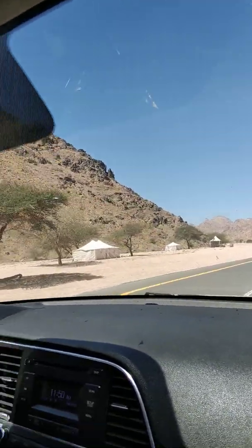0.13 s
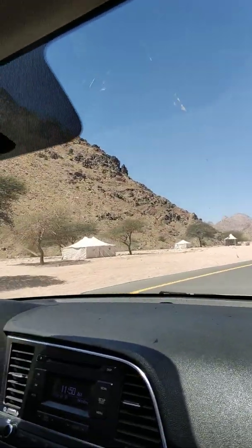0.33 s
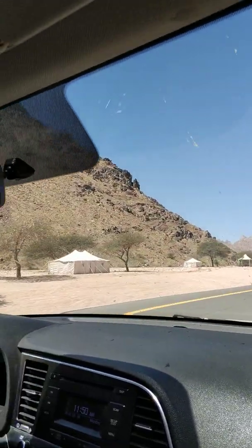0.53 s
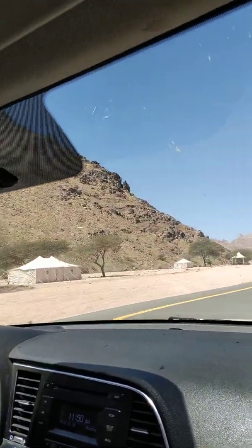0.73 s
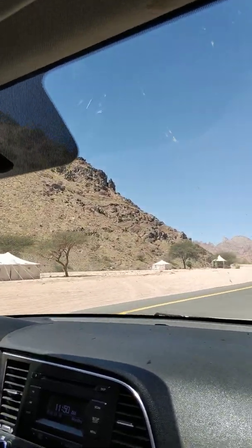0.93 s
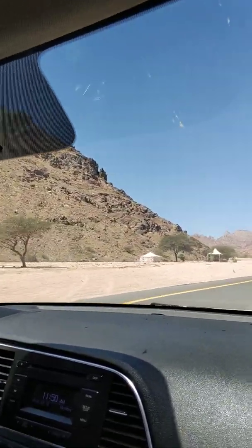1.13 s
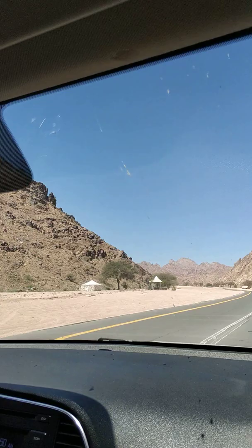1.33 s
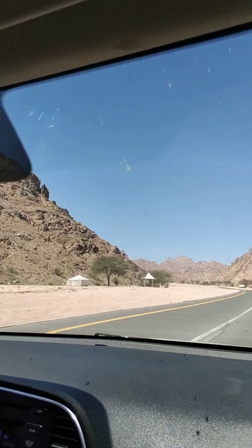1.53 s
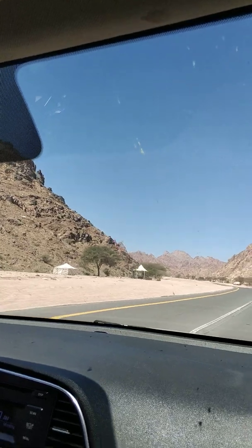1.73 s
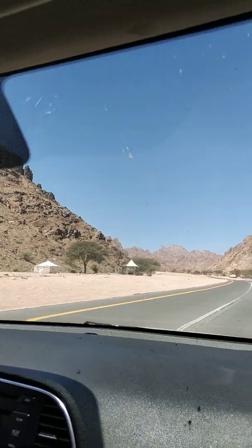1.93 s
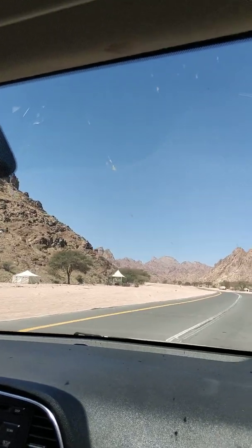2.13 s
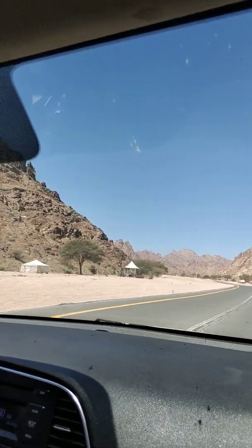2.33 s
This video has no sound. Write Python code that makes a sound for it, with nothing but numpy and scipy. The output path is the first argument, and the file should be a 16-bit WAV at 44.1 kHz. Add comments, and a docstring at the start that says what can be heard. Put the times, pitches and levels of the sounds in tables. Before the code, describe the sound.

Inside a moving car, a heavy low drone surges and flutters with the road surface; dull tyre noise sits behind, tiny clicks and faint rustles come early, then a short plastic rattle; handheld microphone slightly overloaded by bumps.

```python
"""Inside a car at steady speed, about 2.4 s. Throughout: tyres and wind rush dully as shaped stereo noise,
drive-train sines whine, the floor pan thrums, and noise-fed resonances shake the body near 37 Hz and boom
the cabin near 105 Hz around a firing tone. Faint treble rustles start at 0.16, 0.41 and 1.22 s; tiny noise
clicks fall from 0.29 to 1.0 s. From 0.41 s the strongest bumps push low, and the overloaded recorder ticks
thinly at 6 and 12 kHz just before each peak. Near 1.5 s the trim is tapped four times and rings as decaying
sines. The end fades within milliseconds."""
import sys
import numpy as np
from scipy import signal
from scipy.fft import rfft, irfft, next_fast_len
from scipy.io import wavfile
from scipy.ndimage import uniform_filter1d, map_coordinates

SR = 44100
rng = np.random.default_rng(int(sys.argv[2]) if len(sys.argv) > 2 else 0)


def inscribe(sig):
    """Save sig as 16-bit PCM at rate SR to the path in sys.argv[1].

    A 1-D sig is mono; a 2-D sig holds one channel per row.
    Samples are clipped to [-1, 1] before scaling.
    """
    pcm = np.round(np.clip(np.atleast_2d(sig).T, -1, 1) * 32767)
    wavfile.write(sys.argv[1], SR, pcm.astype(np.int16))


N = 105178
T = np.arange(N) / SR
SMOOTH_S = 0.011  # averaging window of road-driven levels and of the swelling estimate


def amp(db):
    """Linear gain from dB."""
    return 10 ** (np.asarray(db) / 20)


def unit(x):
    """x at rms 1."""
    return x / np.sqrt(np.mean(x ** 2) + 1e-20)


def along(points, hz):
    """(freq_hz, value) points read on a log frequency axis."""
    freq_hz, value = np.transpose(points)
    return np.interp(np.log(hz + 1), np.log(freq_hz + 1), value)


def curve(points):
    """(time_s, value) points read at every sample."""
    time_s, value = np.transpose(points)
    return np.interp(T, time_s, value)


def smooth(x):
    """Moving average over SMOOTH_S."""
    return uniform_filter1d(x, int(SMOOTH_S * SR))


def wobble(rate_hz):
    """Smooth random curve with rate_hz knots a second."""
    knots = rng.standard_normal(int(N * rate_hz / SR) + 4)
    return map_coordinates(knots, [T * rate_hz])


def filtered(x, response):
    """x times a response of frequency, zero-padded against wrap-around."""
    m = next_fast_len(N + SR // 2)
    return irfft(rfft(x, m) * response(np.fft.rfftfreq(m, 1 / SR)), m)[..., :N]


def tone(hz):
    """Sine of rms 1 that follows a pitch curve from a random phase."""
    cycles = np.cumsum(hz) / SR + rng.random()
    return np.sqrt(2) * np.sin(2 * np.pi * cycles)


def bell(s, width_s):
    """Gaussian bump in time; width_s is its standard deviation."""
    return np.exp(-.5 * ((T - s) / width_s) ** 2)


def ring(shape):
    """Resonance fed by noise, mono, rms 1."""
    return unit(filtered(rng.standard_normal(N), lambda hz: amp(along(shape, hz))))


def steadied(x, share):
    """x with part of its own swelling divided out, rms 1."""
    size = smooth(np.abs(signal.hilbert(unit(x))))
    return unit(x / (size + 0.11) ** share)


# cabin lean of stereo noise: freq_hz, left_over_right_db
CABIN_LEAN = [(200, .6), (400, -.2), (900, .2), (1800, 4.5), (2800, 5), (5000, -.5), (9000, 1),
              (13000, 1.5)]


def noise(spectrum, alike):
    """Stereo noise of rms 1: mid and side mixed for a given left-right likeness, then leaned."""
    def mid_side(hz):
        turn = np.arccos(np.clip(along(alike, hz), -1, 1)) / 2
        return amp(along(spectrum, hz)) * [np.cos(turn), np.sin(turn)]

    def lean(hz):
        half_db = along(CABIN_LEAN, hz) / 2
        return amp([half_db, -half_db])

    mid, side = filtered(rng.standard_normal((2, N)), mid_side)
    return unit(filtered(np.array([mid + side, mid - side]), lean))


# air hiss spectrum: freq_hz, density_db
HISS_SPECTRUM = [(2200, -30), (3200, -1), (4000, -2.5), (5000, -5.5), (6300, -5.5), (8000, -5), (10000, -8),
                 (13000, -11.5), (15700, -16.5)]
# treble nearly unrelated left to right: freq_hz, likeness_ratio
AIR_LIKENESS = [(3000, .1)]
HISS_DB = -66  # mean


def hiss():
    """Thin broadband air noise, slightly unsteady."""
    return amp(HISS_DB + 0.73 * wobble(12)) * noise(HISS_SPECTRUM, AIR_LIKENESS)


# tyre and wind rush spectrum: freq_hz, density_db
RUSH_SPECTRUM = [(150, -52.5), (250, -11.5), (281, -11.5), (303, -8.5), (355, -7.5), (375, -18.5),
                 (408, -14.5), (527, -13.5), (789, -21), (850, -21), (925, -22), (1220, -29.5),
                 (2010, -30.5), (2600, -35.5), (2950, -43), (3400, -45), (4130, -64), (7000, -120)]
# likeness of cabin noise, left to right: freq_hz, likeness_ratio
CABIN_LIKENESS = [(100, 0.98), (200, 0.98), (330, .7), (500, 0.021), (760, 0.48), (1200, .3), (1800, -0.36),
                  (2800, 0.34)]
RUSH_DB = -42  # mean


def rush():
    """Tyres and wind through the trim: dull noise with slow and quick unsteadiness."""
    level_db = RUSH_DB + 1.0 * wobble(1.5) + 0.6 * wobble(16)
    return amp(level_db) * noise(RUSH_SPECTRUM, CABIN_LIKENESS)


# road roar, before ROAR_OVER_DB and wobble: time_s, level_db
ROAR_LEVEL = [(0.03, -30), (0.12, -40.5), (0.15, -31.5), (0.23, -37), (0.27, -29.5), (1.01, -30),
              (1.07, -27), (1.12, -32), (1.46, -27), (1.76, -33), (1.89, -26.5), (1.92, -33.5),
              (2.03, -30.5), (2.38, -35)]
# road roar spectrum: freq_hz, density_db
ROAR_SPECTRUM = [(40, -120), (60, -2), (72, -15.5), (100, -1), (135, -5.5), (152, -7), (178, -15),
                 (200, -12.5), (235, -31), (270, -30.5), (400, -29), (800, -120)]
ROAR_OVER_DB = 6


def roar():
    """Low noise whose level follows the road surface."""
    level_db = curve(ROAR_LEVEL) + ROAR_OVER_DB + 1.4 * wobble(8.9)
    return amp(level_db) * noise(ROAR_SPECTRUM, CABIN_LIKENESS)


# drive-train tones, mean values before lean: pitch_hz, level_db
WHINE_TONES = [(179, -39.5), (247, -56.5), (403, -53), (428, -63.5), (528, -63.5), (806, -61.5),
               (905, -61.5)]


def engine():
    """Faint drive-train sines, unsteady in pitch and level."""
    out = np.zeros(N)
    for pitch_hz, level_db in WHINE_TONES:
        level = amp(level_db + 0.35 * wobble(5.3))
        out += level * tone(pitch_hz * (1 + .003 * wobble(3)))
    return out


# rustles, before flutter: start_s, length_s, level_db
RUSTLE_TIMES = [(.16, .13, -63), (.41, .17, -67), (1.22, .14, -69)]
# rustle spectrum: freq_hz, density_db
RUSTLE_SPECTRUM = [(3000, -20), (4500, -6), (8500, 0), (11000, -6), (13000, -6), (14500, -3), (15700, -6)]
RUSTLE_EDGE_S = .025


def rustles():
    """Faint rustling nearby: ramped treble noise with a rapid random flutter."""
    edge = lambda u: np.clip(u / RUSTLE_EDGE_S, 0, 1)
    swell = np.zeros(N)
    for start_s, length_s, level_db in RUSTLE_TIMES:
        swell += amp(level_db) * edge(T - start_s) * edge(start_s + length_s - T)
    return swell * amp(2.1 * wobble(90)) * noise(RUSTLE_SPECTRUM, AIR_LIKENESS)


# tiny clicks, before CLICK_TRIM_DB and lean: centre_s, level_db
CLICK_TIMES = [(0.287, -50.5), (0.293, -71.5), (0.416, -54), (0.679, -55.5), (0.728, -58.5), (1.005, -62)]
CLICK_HZ, CLICK_WIDE_HZ, CLICK_S = 9000, 1900, .0015  # widths are standard deviations
CLICK_TRIM_DB, CLICK_LEAN_DB = -4.5, 1.5


def clicks():
    """Tiny clicks nearby: millisecond bursts of treble noise, stronger on the left."""
    band = lambda hz: np.exp(-.5 * ((hz - CLICK_HZ) / CLICK_WIDE_HZ) ** 2)
    snap = unit(filtered(rng.standard_normal((2, N)), band))
    bursts = sum(amp(db + CLICK_TRIM_DB) * bell(s, CLICK_S) for s, db in CLICK_TIMES)
    return bursts * snap * amp([[CLICK_LEAN_DB], [-CLICK_LEAN_DB]])


# trim taps: start_s, base_db, main_mode_offset_db, offset_over_3khz_db
TAP_TIMES = [(1.4865, -32, -20, -14), (1.5022, -31, 0, 2), (1.5095, -39, 0, 0), (1.544, -46, -10, 0)]
# trim modes, main first: pitch_hz, left_gain_ratio, right_gain_ratio, t60_s
TRIM_MODES = [(2370, 1, .15, .028), (2050, .17, .08, .025), (2700, .19, .08, .025), (3380, .16, .2, .022),
              (3520, .1, .08, .025)]


def taps():
    """Plastic trim rings as brief decaying modes; the main one sits on the left."""
    out = np.zeros((2, N))
    for start_s, base_db, main_db, upper_db in TAP_TIMES:
        t = np.maximum(T - start_s, 0)
        attack = 1 - np.exp(-t / .0015)
        for k, (pitch_hz, left, right, t60_s) in enumerate(TRIM_MODES):
            mode_db = base_db + main_db * (k == 0) + upper_db * (pitch_hz > 3000)
            mode_db += rng.normal(0, 1.5)
            mode = amp(mode_db - 60 * t / t60_s) * np.sin(2 * np.pi * pitch_hz * t)
            out += np.array([[left], [right]]) * mode * attack
    return out


# floor-pan thrum, before THRUM_UNDER_DB: time_s, level_db
THRUM_LEVEL = [(0.0, -42.5), (0.16, -43), (0.2, -50.5), (0.29, -40), (0.34, -44.5), (0.4, -40),
               (0.5, -44.5), (0.53, -34), (0.56, -43.5), (0.66, -32), (0.69, -38), (1.29, -43.5),
               (1.64, -34), (1.66, -38.5), (1.9, -41), (1.92, -43), (1.96, -42), (2.38, -40.5)]
# floor-pan resonance: freq_hz, density_db
PAN_SPECTRUM = [(150, -120), (205, -13), (245, 1.5), (280, 0), (320, -15.5), (450, -120)]
THRUM_UNDER_DB = 1.5
STEADY_BOOM = 0.78  # exponent of swelling divided out, shared with the boom


def thrum():
    """The floor pan hums in uneven surges; only its mono part is steadied."""
    pan = noise(PAN_SPECTRUM, CABIN_LIKENESS)
    mid = pan.mean(0)
    return amp(curve(THRUM_LEVEL) - THRUM_UNDER_DB) * (steadied(mid, STEADY_BOOM) + (pan - mid))


# overload ticks and the bumps behind them, before lean: tick_s, tick_db, tick_width_ms, push_db, push_sign
BUMP_TIMES = [(.409, -62, .4, -12, 1), (0.6008, -53, .6, -14, -1), (0.6675, -52, .6, -14, 1),
              (0.7095, -61, .4, -14, -1), (1.1818, -44.5, .5, -8, 1), (1.374, -62, .4, -17, 1),
              (1.4537, -55, 1.3, -9, 1), (1.4932, -54, .3, -10, -1), (1.5652, -53, .4, -9, -1),
              (1.580, -57, .35, -14, 1), (1.667, -58, .5, -13, -1), (2.2956, -50, .5, -12, 1)]
TICK_HZ, TICK_OCTAVE_DB = 6000, -5


def overload_ticks():
    """The recorder overloads at the strongest bumps: brief 6 and 12 kHz sines just before each peak."""
    sines = np.sin(2 * np.pi * TICK_HZ * T)
    sines += amp(TICK_OCTAVE_DB) * np.sin(2 * np.pi * 2 * TICK_HZ * T)
    return sum(amp(db) * bell(s, width_ms * 1e-3) for s, db, width_ms, _, _ in BUMP_TIMES) * sines


PUSH_S, PUSH_LAG_S = 0.0032, 0.0011  # width; peak after tick


def bumps():
    """Each strong bump is one low push with a dip of opposite sign on either side."""
    out = np.zeros(N)
    for tick_s, _, _, push_db, sign in BUMP_TIMES:
        peak_s = tick_s + PUSH_LAG_S
        push = bell(peak_s, PUSH_S) * (1 - ((T - peak_s) / PUSH_S) ** 2)
        out += sign * amp(push_db) * push
    return out


# body shake, before smoothing and lean: time_s, level_db
SHAKE_LEVEL = [(0.0, -25), (0.03, -22.5), (0.38, -24.5), (0.4, -14), (0.48, -31.5), (0.61, -17),
               (0.63, -24), (0.66, -17), (0.82, -20.5), (0.84, -26.5), (0.89, -13.5), (0.93, -31.5),
               (0.95, -20), (1.16, -23.5), (1.24, -19.5), (1.32, -26.5), (1.36, -14.5), (1.39, -19.5),
               (1.71, -15.5), (1.74, -27), (1.8, -24.5), (1.83, -33.5), (1.87, -21), (1.9, -28),
               (2.12, -21), (2.27, -27), (2.29, -18), (2.33, -41), (2.35, -28), (2.38, -19.5)]
# body resonance: freq_hz, density_db
SWAY_SPECTRUM = [(8, -32.5), (18, -10.5), (28, -3.5), (37, 4), (46, -0.5), (56, -8.5), (70, -25.5),
                 (120, -120)]
STEADY_SHAKE = 0.51  # exponent of swelling divided out
SHAKE_LEAN_DB = 0.3


def shake():
    """The road drives the body's low resonance, stronger on the left."""
    body = steadied(ring(SWAY_SPECTRUM), STEADY_SHAKE)
    return amp(smooth(curve(SHAKE_LEVEL))) * body * amp([[SHAKE_LEAN_DB], [-SHAKE_LEAN_DB]])


FIRING_HZ, FIRING_DB = 109, 0.5  # mean pitch; level over the cabin resonance


def firing():
    """The engine's firing tone: one sine, its pitch drifting slightly."""
    return amp(FIRING_DB) * tone(FIRING_HZ + 0.55 * wobble(2.4))


# cabin boom, before smoothing and lean: time_s, level_db
BOOM_LEVEL = [(0.0, -25), (0.16, -18), (0.17, -24.5), (0.26, -16.5), (0.32, -26), (0.36, -14),
              (0.45, -22.5), (0.48, -12), (0.5, -23), (0.6, -14), (0.63, -26.5), (0.66, -26.5), (0.7, -15),
              (0.77, -26), (0.95, -16.5), (0.97, -23.5), (1.15, -19), (1.17, -19), (1.34, -25), (1.38, -14),
              (1.4, -26), (1.46, -28), (1.49, -16.5), (1.54, -24), (1.57, -13.5), (1.64, -28.5),
              (1.68, -18.5), (1.76, -27.5), (1.79, -12.5), (1.82, -18), (1.85, -34), (1.88, -23),
              (1.9, -15.5), (1.95, -25.5), (1.99, -21), (2.02, -26), (2.09, -19.5), (2.14, -24.5),
              (2.19, -14.5), (2.23, -28.5), (2.24, -19), (2.3, -16), (2.34, -21.5), (2.38, -11.5)]
# cabin resonance: freq_hz, density_db
CABIN_SPECTRUM = [(50, -120), (76, -17.5), (88, -9.5), (98, 0), (110, -4), (125, -8), (138, -15.5),
                  (190, -120)]


def boom(firing_tone):
    """The road drives the cabin resonance; the firing tone sits inside it."""
    cabin = ring(CABIN_SPECTRUM) + firing_tone
    return amp(smooth(curve(BOOM_LEVEL))) * steadied(cabin, STEADY_BOOM)


def scene():
    """All layers; body, engine, bumps and overload ticks lean slightly left."""
    firing_tone = firing()
    main = shake() + boom(firing_tone) + engine() + bumps() + overload_ticks()
    background = roar() + hiss() + rush() + thrum() + taps() + clicks() + rustles()
    return main * amp([[.35], [-.35]]) + background


TOP_HZ, FADE_S = 15760, .006


def record(dry):
    """Round large peaks softly, fade the end, cut all above TOP_HZ."""
    soft = dry / (1 + np.abs(dry / 0.86) ** 4) ** (1 / 4)
    fade = np.sin(np.pi / 2 * np.clip((T[-1] - T) / FADE_S, 0, 1)) ** 2
    return filtered(soft * fade, lambda hz: hz < TOP_HZ)


dry = scene()
out = record(dry)
inscribe(out)
```